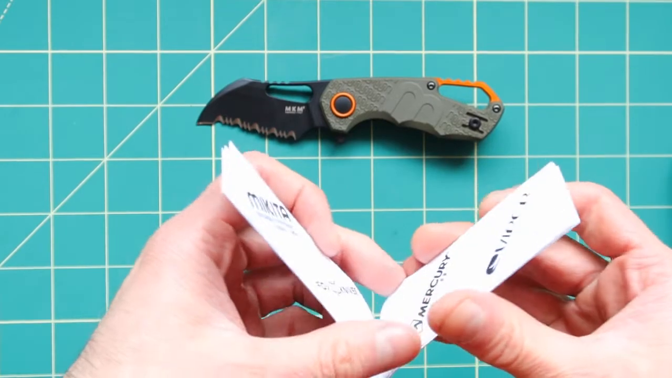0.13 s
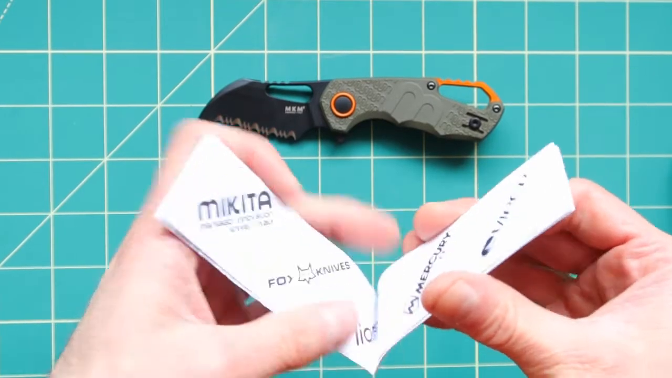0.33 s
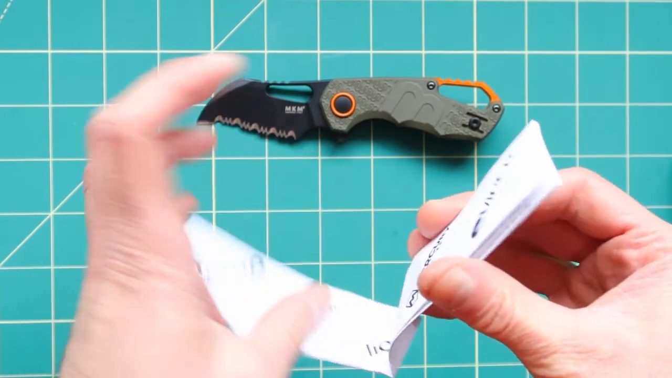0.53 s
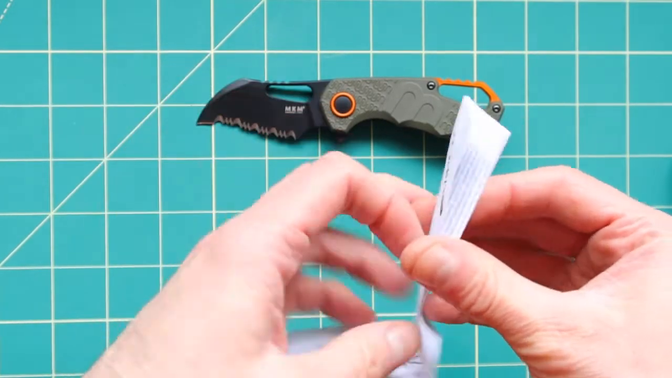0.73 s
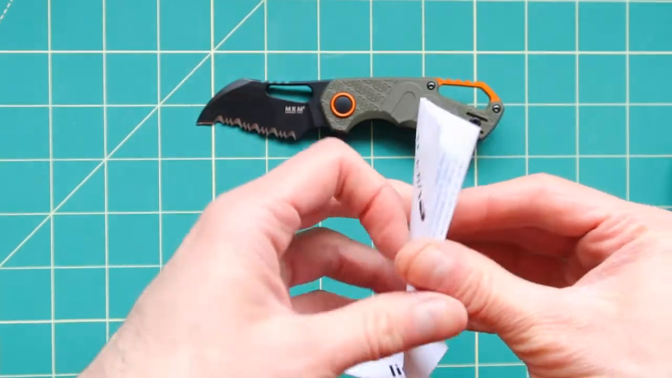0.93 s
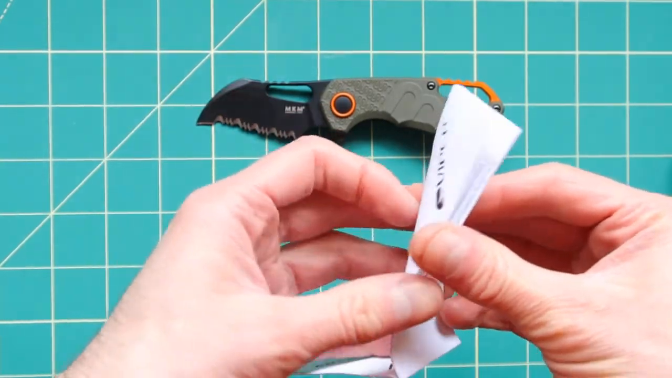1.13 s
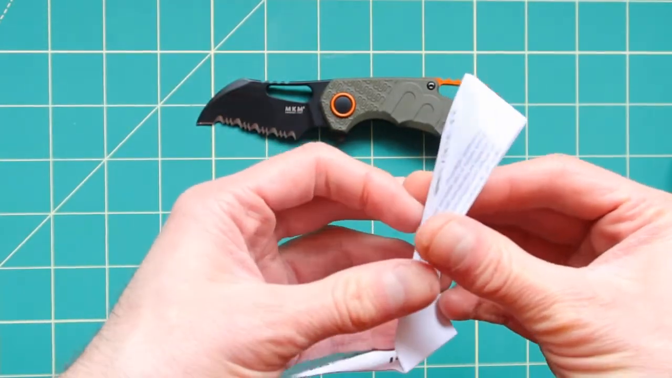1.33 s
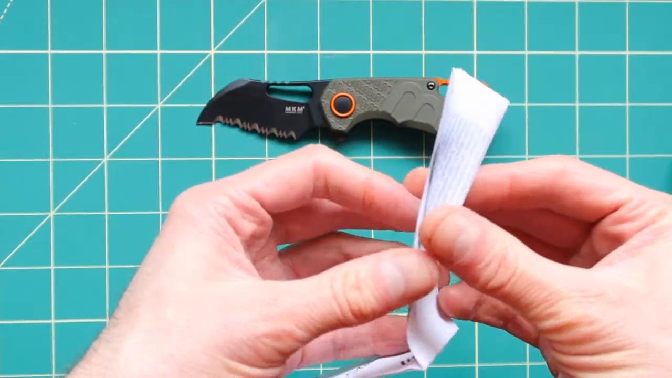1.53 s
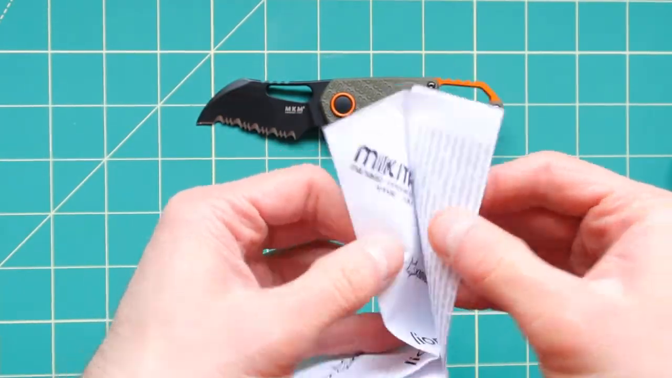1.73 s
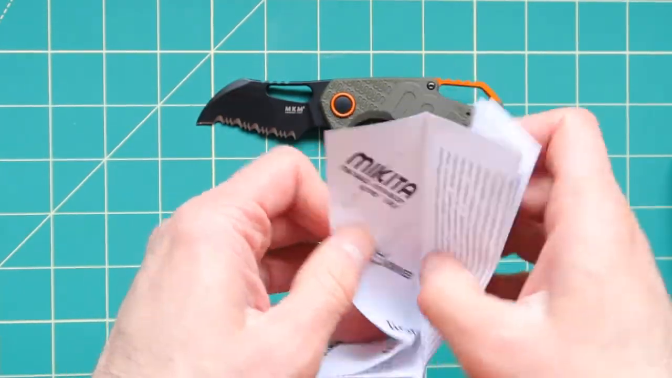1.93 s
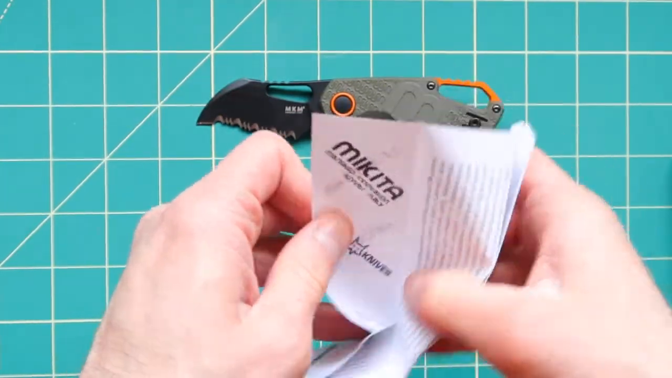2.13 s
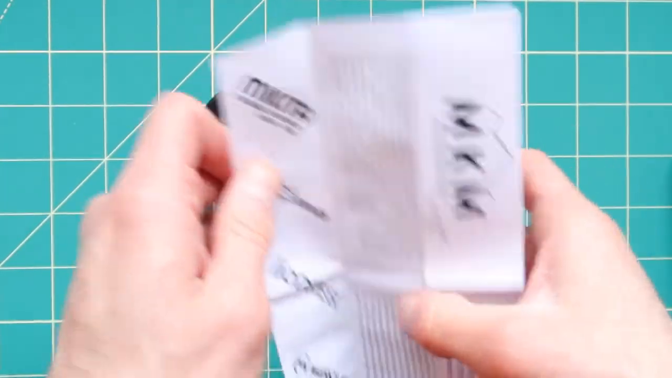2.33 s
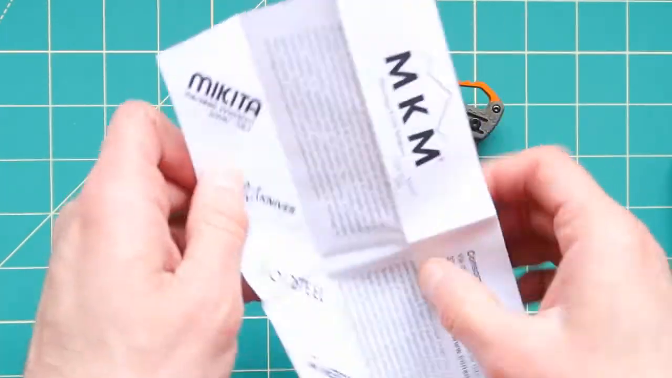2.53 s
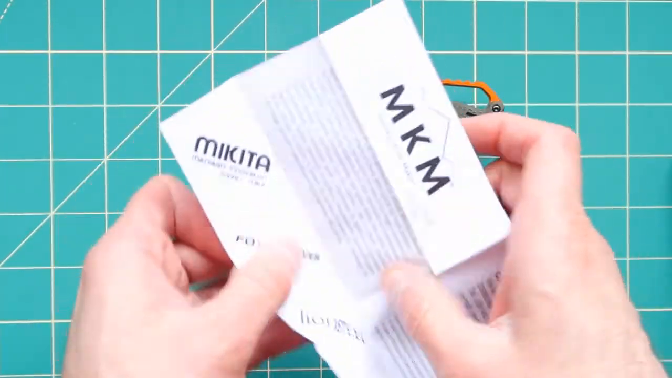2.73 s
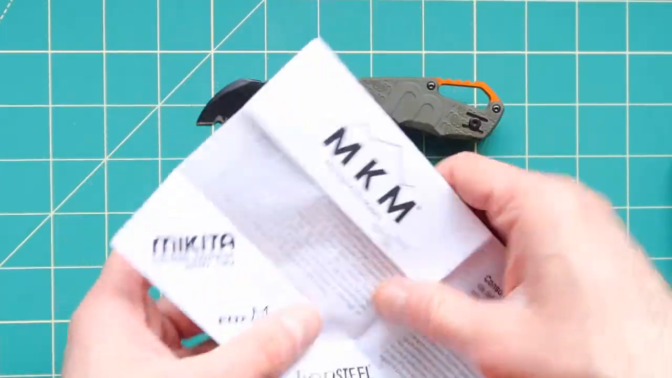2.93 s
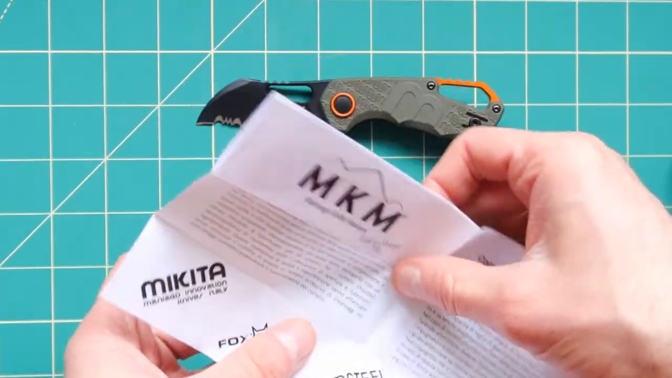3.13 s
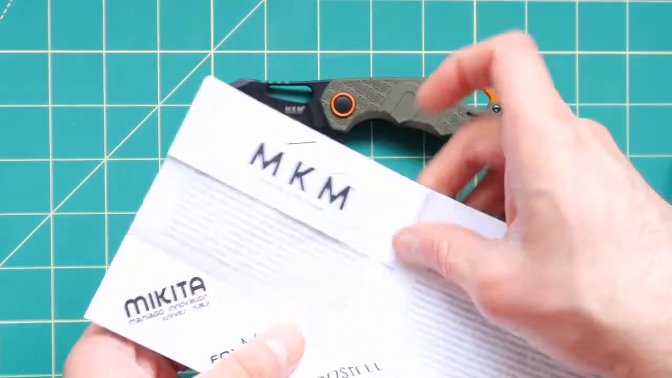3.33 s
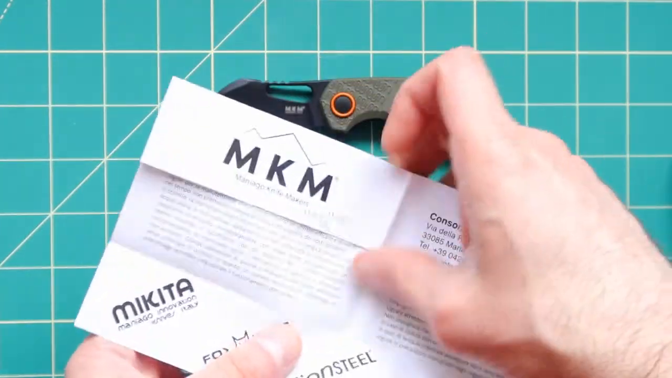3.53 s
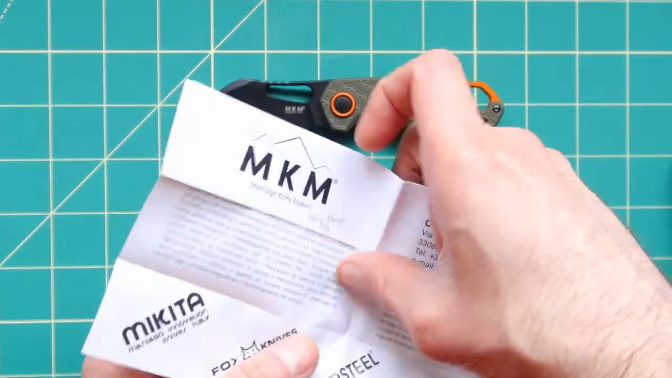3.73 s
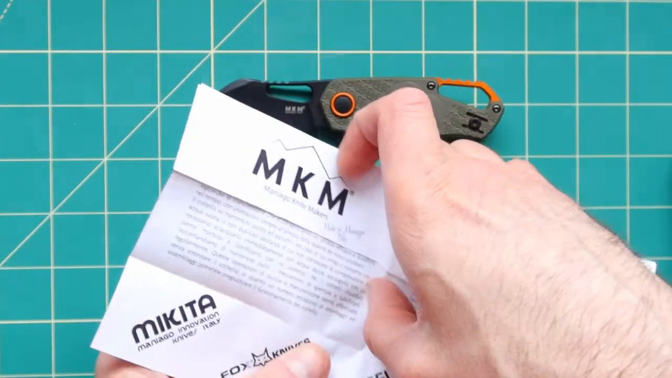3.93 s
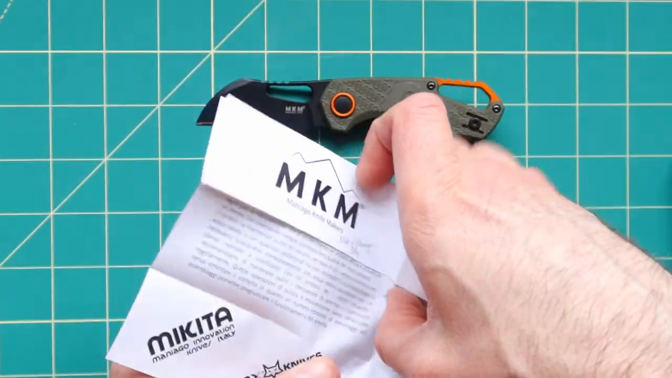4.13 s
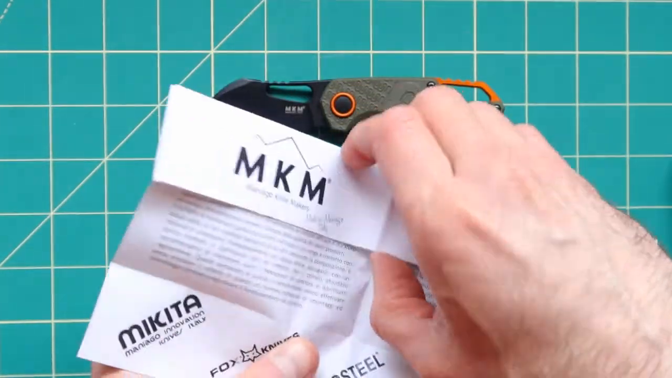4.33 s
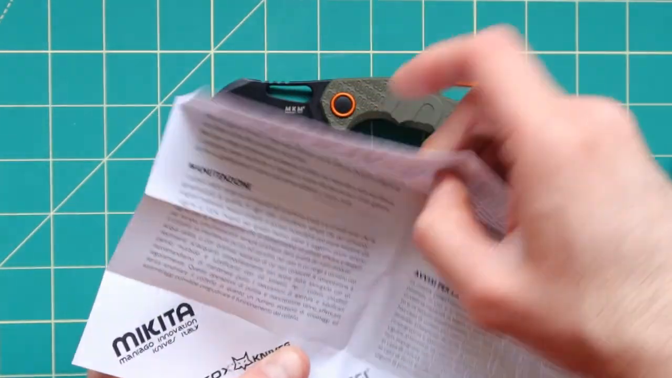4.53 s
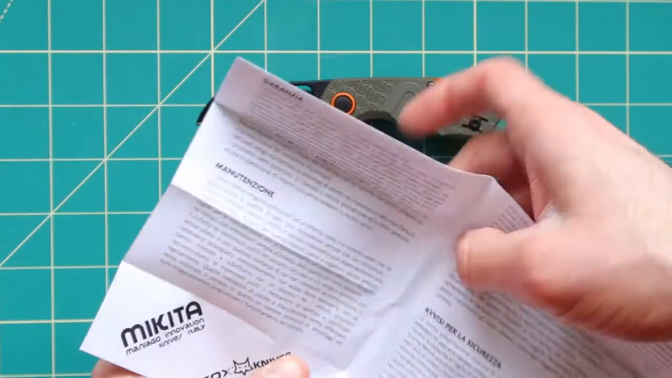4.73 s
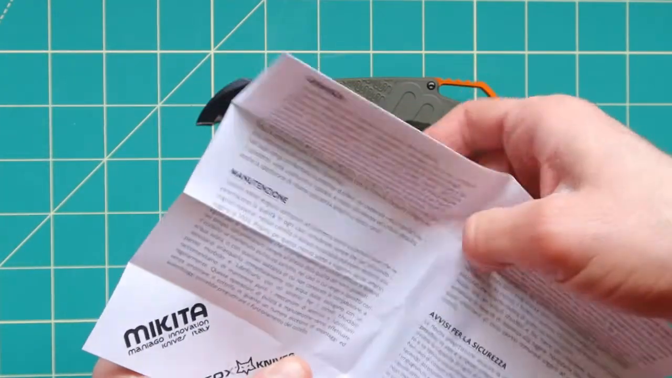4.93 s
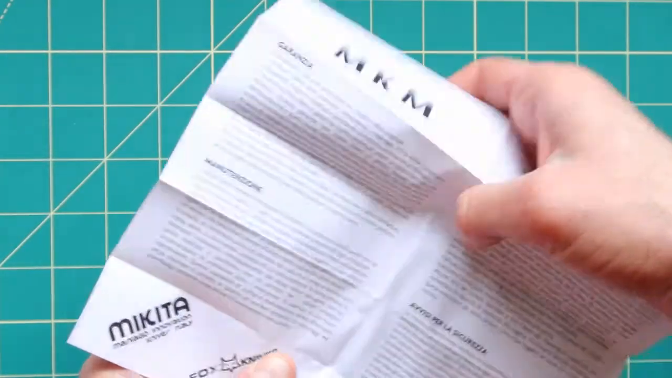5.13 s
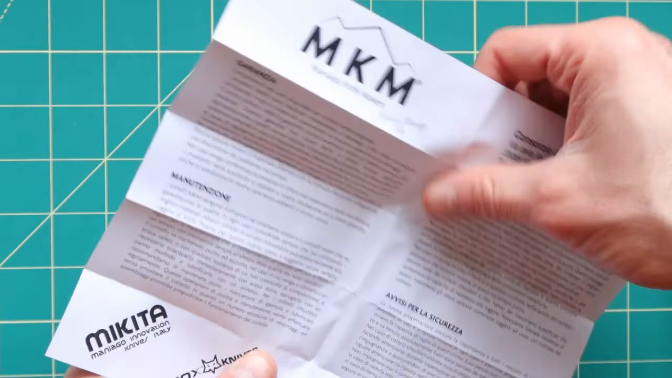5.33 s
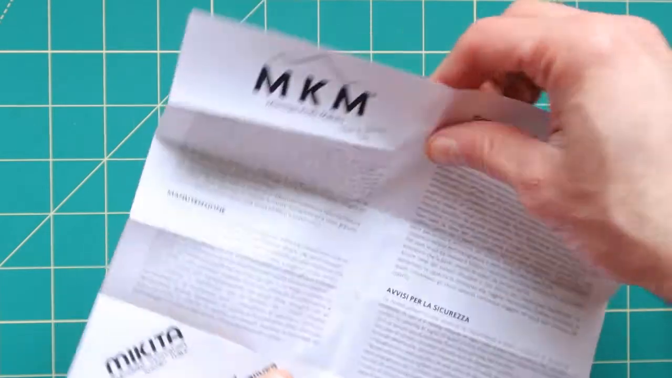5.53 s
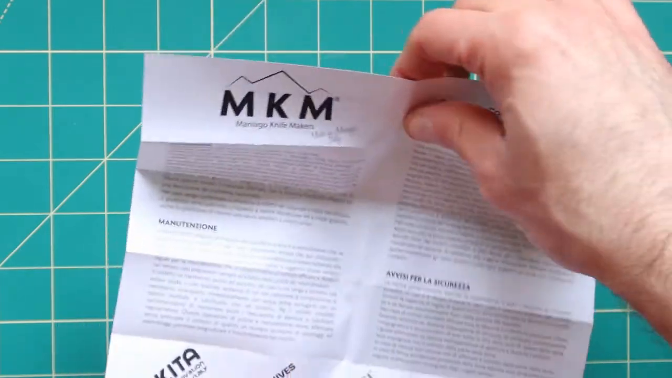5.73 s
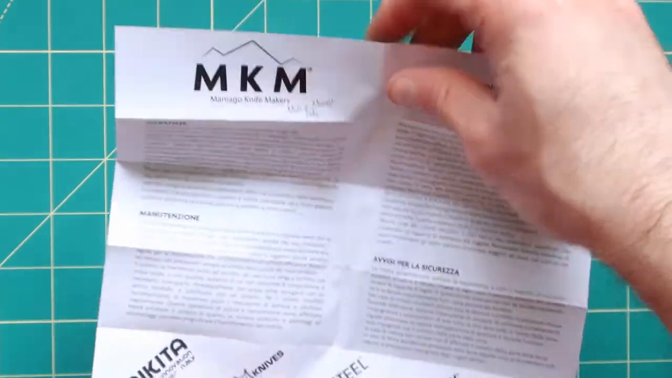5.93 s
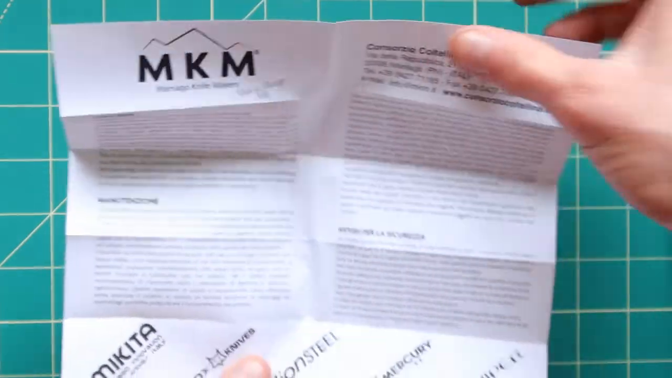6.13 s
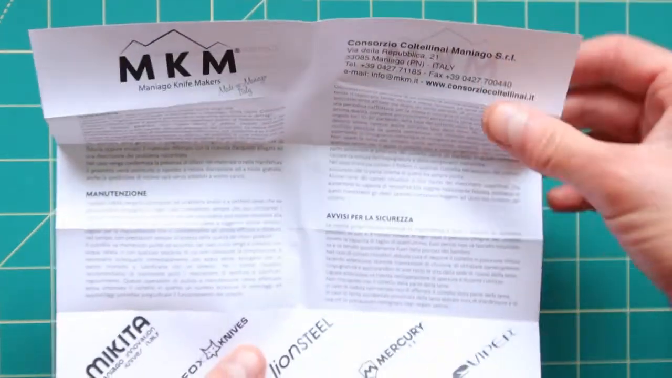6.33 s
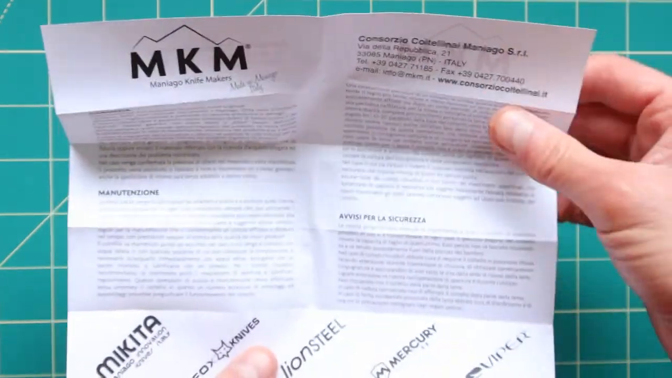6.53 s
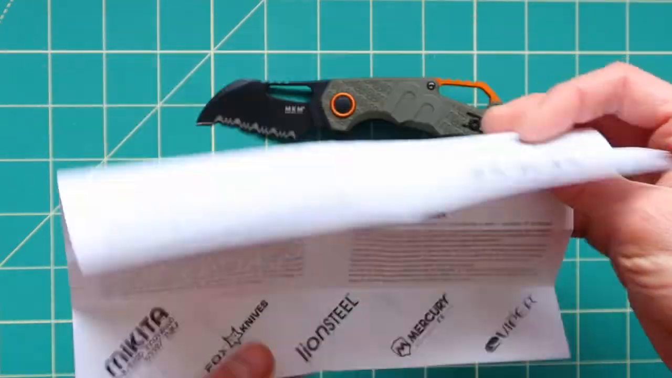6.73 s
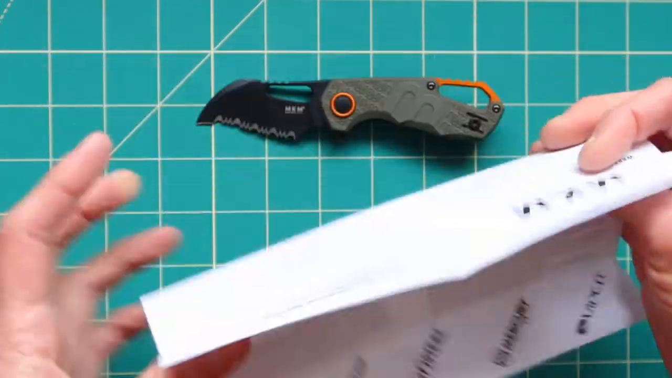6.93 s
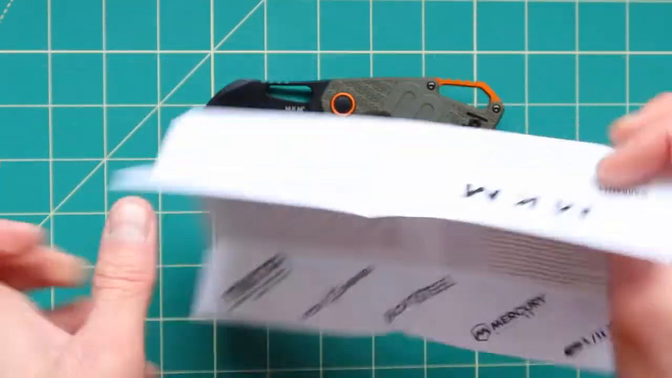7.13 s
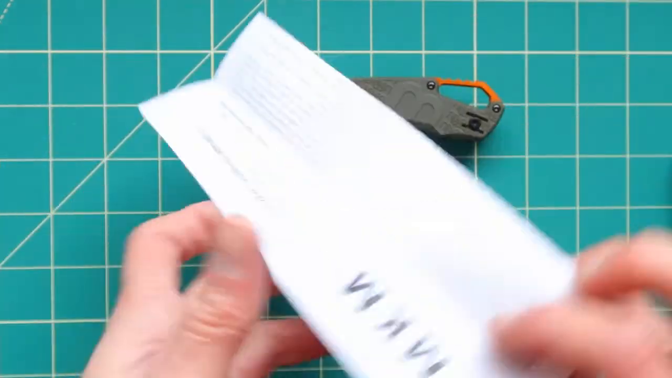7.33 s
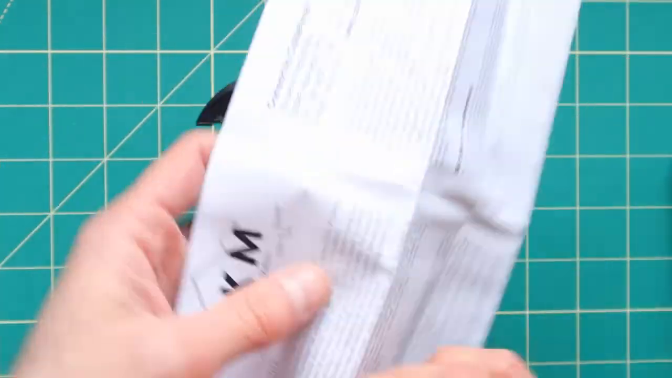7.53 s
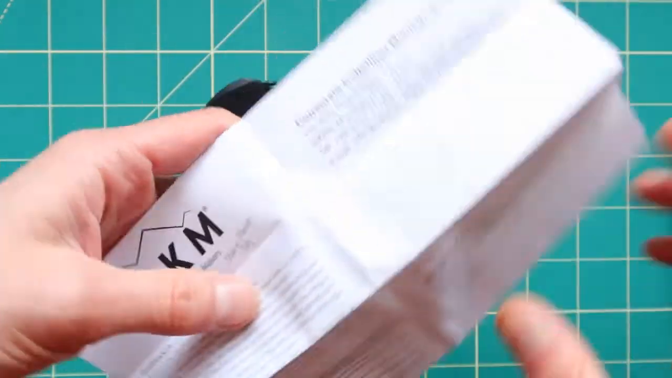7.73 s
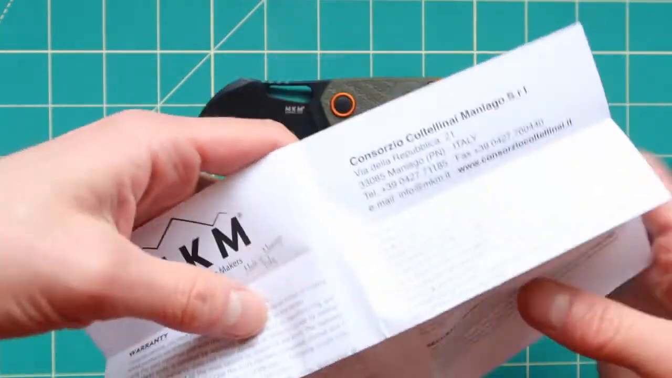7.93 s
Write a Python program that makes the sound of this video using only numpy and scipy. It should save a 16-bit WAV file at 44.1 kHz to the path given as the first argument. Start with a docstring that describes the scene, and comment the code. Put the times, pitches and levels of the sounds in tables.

```python
"""Unfolding a creased paper leaflet

Two hands unfold a leaflet over a desk, heard close up in a quiet room. Creases and panels snap:
noise bursts with a crack, coloured by two resonances. Fingers and folds slide with a grainy hiss of noise
and tiny rings; the half-open fold pops as gliding sines, with dull knocks. Moving paper pushes low noise
puffs. A hum, rumble and room noise lie under it; the highest peaks flatten at a soft ceiling."""
import sys
import numpy as np
from scipy import signal
from scipy.fft import rfft, irfft
from scipy.io import wavfile
from scipy.ndimage import uniform_filter1d, map_coordinates

SR = 44100
rng = np.random.default_rng(int(sys.argv[2]) if len(sys.argv) > 2 else 0)


def store_wav(level_fs):
    """Save 16-bit WAV to argv[1]."""
    pcm = np.round(np.clip(np.atleast_2d(level_fs), -1, 1) * 32767)
    wavfile.write(sys.argv[1], SR, pcm.T.astype(np.int16))


N = 356239

# room noise spectrum: (frequency [Hz], relative level [dB])
FLOOR_COLOUR = [(20, -3.5), (60, 7), (120, -3), (165, 1.5), (195, 9.5), (250, -1.5), (600, -2), (1200, 0),
                (2500, -21), (8000, -32), (16000, -32)]
# low rumble spectrum: (frequency [Hz], relative level [dB])
RUMBLE_COLOUR = [(20, -20), (60, -17), (95, -1.5), (150, 0), (260, -13.5), (600, -30)]
# room decay: (frequency [Hz], t60 [s])
ROOM_T60 = [(200, 0.18), (1000, 0.39), (4000, 0.29), (9000, 0.35), (16000, 0.76)]
# pushed air spectrum: (frequency [Hz], relative level [dB])
AIR_COLOUR = [(15, -21), (40, -1), (80, 9.5), (140, 3.5), (240, -11), (500, -30), (1500, -77)]
# sheet flutter spectrum: (frequency [Hz], relative level [dB])
FLUTTER_COLOUR = [(40, -15), (110, -5), (170, -9.5), (240, 0.5), (330, -7), (500, -1.5), (1500, -53)]
# swings of the loose open sheet: (time [s], length [s], level [dB])
SWINGS = [(6.74, 0.09, -39), (6.916, 0.048, -41.5), (7.26, 0.053, -33.5), (7.451, 0.059, -32.5),
          (7.942, 0.04, -38.5)]
# slides of paper on skin or on itself:
# (time [s], length [s], friction [dB], swell start to end [dB], body [dB], edge [dB])
STROKES = [(0, 0.081, -26.5, -9, 0, -4.5), (0.157, 0.075, -40.5, 17, -11, -11),
           (.25, 0.056, -36.5, 4, 5, -9), (0.362, .19, -28.5, 1.5, 2.5, 6), (.58, 0.077, -44, -11, 8, 14),
           (0.68, 0.16, -34.5, -11, 4, 6.5), (.865, 0.16, -38, -4, -1, -0.5),
           (1.033, 0.076, -23.5, -9, -5, -1.5), (1.183, 0.054, -31, -3, -7, -2.5),
           (1.265, 0.069, -44.5, -3, -5, 6), (1.368, 0.016, -37, 5, 1, 15.5),
           (1.476, 0.032, -23, 3, -6, -1), (1.586, 0.023, -29, 15, -1.5, 1),
           (1.661, 0.082, -17.5, -17, -8.5, -3), (1.742, 0.064, -22, -1, -17, -10),
           (1.834, 0.21, -27, 2.5, 2, 1.5), (2.078, 0.19, -23, -6, -5.5, -4.5),
           (2.238, 0.21, -13.5, -8, -3.5, -7), (2.47, 0.22, -27.5, -12, 2, -9),
           (2.639, 0.19, -21.5, 9, 0.5, -5), (2.919, 0.16, -17.5, -0.5, 1, -5.5),
           (3.172, 0.17, -32.5, -10, 6.5, -1.5), (3.319, 0.14, -21, -4, 2.5, -2),
           (3.507, 0.14, -22.5, 9, 1, -2.5), (3.703, 0.098, -24.5, 2.5, 7, -3.5),
           (3.88, 0.31, -21.5, -1.5, 2, -10.5), (4.175, 0.13, -24, 3.5, 1, -6.5),
           (4.334, .15, -30.5, -4, 7.5, -11), (4.481, .115, -18.5, 3.5, 4.5, -6),
           (4.672, 0.073, -24.5, 9, 3.5, -4.5), (4.864, 0.063, -18, -6, -1, -7.5),
           (5.019, 0.24, -24.5, 4, -3.5, -7), (5.25, 0.12, -33.5, 5, -2, -9),
           (5.34, 0.18, -21.5, 7, 6.5, -7.5), (5.522, 0.22, -34.5, 3, 2, 1), (5.877, 0.13, -38, 3, 1, -3),
           (6.02, 0.11, -30.5, -4, 3.5, 1), (6.152, 0.25, -35, 5.5, -9, 1),
           (6.385, 0.14, -37, -12, 8.5, -5), (6.584, .16, -27.5, -4.5, 2.5, -0.5),
           (6.715, 0.21, -22, -2.5, -5, -3), (6.926, 0.31, -23.5, -1, -3, -3),
           (7.195, 0.13, -18, 8.5, 3.5, -5.5), (7.35, 0.19, -22, 10, 3, -3),
           (7.58, .13, -29, -15.5, 5.5, -1.5), (7.68, .05, -30.5, -11, -4, -12),
           (7.858, .08, -44, -3, 11, -14), (7.944, 0.16, -26, 8, 3, -8.5)]
# sliding spectrum: (frequency [Hz], relative level [dB])
SLIDE_COLOUR = [(200, -7.5), (380, -8.5), (550, -7.5), (920, -7), (1300, -12), (1750, -11.5), (2450, -11.5),
                (3400, -9), (5500, -5.5), (7400, -6.5), (8700, -2.5), (10100, -15), (12800, -8),
                (15500, -20)]
# tuning of the rubbed sheet by grip and opening:
# (time [s], bass corner [Hz], panel resonance [Hz], resonance height [dB])
GRIP = [(0, 220, 910, -12), (1.45, 200, 900, -7), (1.7, 200, 800, 4), (2.3, 210, 540, -3),
        (3.0, 403, 1090, 6), (3.5, 430, 1520, 2.5), (4.05, 473, 840, 6), (4.6, 269, 1350, 6.5),
        (5.3, 230, 1210, 5), (5.75, 302, 1320, 17.5), (6.1, 330, 1210, 8), (6.5, 300, 1240, 12.5),
        (7.1, 191, 1370, 14.5), (7.5, 150, 1750, 6)]
# span of the knocks of half-open panels on the fingers: (start [s], end [s])
KNOCK_SPAN_S = (2.4, 5.6)
# hollow pops of the half-open fold: (time [s], level [dB], settled pitch [Hz])
POPS = [(2.16, -12.5, 545), (2.286, -23.5, 556), (2.454, -18.5, 544)]
# snaps of creases and panels: (time [s], relative strength [dB], nominal mid-band t60 [s],
# body [dB], edge [dB], panel resonance [Hz], crease resonance [Hz])
SNAPS = [(.1596, -9.5, 0.015, -18, 2, 900, 2260), (.2967, -16.5, .07, 8, 30.5, 1600, 2750),
         (.384, -3, 0.055, 2, 11, 1820, 2770), (0.512, 0.5, 0.034, 0, 13, 880, 3950),
         (0.536, 2, 0.083, -5, 17.5, 920, 2070), (0.726, -8, 0.083, 9, 11, 1330, 2160),
         (0.7721, -5, 0.036, 8.5, 8, 1500, 2460), (1.0482, 2, 0.039, -2, 1, 1900, 4600),
         (1.2076, -4.5, 0.029, -19, 12.5, 1900, 6690), (1.408, -6, 0.046, 9, 17, 1570, 2800),
         (1.7456, 14.5, 0.02, -7.5, 13.5, 774, 3600), (1.7665, 12, .009, -5.5, 5, 870, 5930),
         (1.8, 24, 0.029, -5.5, 3.5, 525, 3000), (1.9564, 22.5, 0.023, -12.5, -0.5, 460, 8030),
         (1.984, 17, .015, -5, -3.5, 605, 2070), (1.9895, 15, .024, -13, -6, 805, 4970),
         (2.0323, 11.5, 0.031, 4, -0.5, 1820, 4270), (2.1457, 18, .016, -14, -17, 850, 2050),
         (2.1596, 22.5, 0.029, -3.5, -8.5, 540, 2120), (2.2534, 17.5, 0.016, -14, -6, 980, 2350),
         (2.3415, 23, 0.015, -11, 5.5, 1930, 3540), (2.4208, 22, .039, -13.5, -2.5, 940, 3900),
         (2.4424, 16.5, 0.042, 2.5, -2, 870, 2460), (2.4533, 24.5, .019, -11.5, -1.5, 570, 2610),
         (2.4971, 11.5, 0.017, -18, -7, 840, 2060), (2.545, 19.5, .025, -9, 7, 1820, 3770),
         (2.6731, 11.5, .1, -1, 1.5, 1220, 1880), (2.6917, 6, 0.022, 1, 5, 930, 1890),
         (2.7572, -8, 0.0091, 14, -4, 1390, 3660), (2.786, 13.5, 0.022, 1.5, 1, 770, 5650),
         (2.8185, 5, 0.011, 2, -6, 1110, 2330), (2.8412, 20.5, 0.02, -5.5, 0, 840, 4660),
         (2.875, -9.5, .013, 16, -6, 1110, 2350), (2.9862, 21, 0.0054, -15, -8.5, 1240, 2360),
         (3.0053, 15.5, .009, -14, 6, 890, 4930), (3.021, 0, .012, 7, 0, 1040, 2450),
         (3.0336, -2.5, 0.069, 18.5, -3, 1330, 2550), (3.0529, 11.5, 0.013, 8, -2, 1400, 2090),
         (3.058, 15.5, 0.023, 1, -6, 940, 2450), (3.153, -3.5, 0.0098, 0.5, -12, 910, 3000),
         (3.3499, -6.5, 0.022, 19, -7, 1260, 2770), (3.4093, -5.5, 0.022, 15.5, 2, 1000, 2500),
         (3.4583, 23.5, .026, -0.5, -0.5, 970, 5600), (3.543, -4.5, 0.035, 14, -13, 1290, 2660),
         (3.593, 5, 0.03, 3.5, 1, 900, 2980), (3.62, 11.5, .078, 4.5, 5, 1460, 4430),
         (3.6888, 21, 0.029, -3, 7, 1410, 4730), (3.6998, 16.5, 0.0085, -7.5, -17, 974, 1840),
         (3.7432, 14, 0.038, -1.5, 3.5, 507, 2600), (3.7632, 4.5, 0.049, 7.5, -5, 1310, 5560),
         (3.8276, 5.5, 0.0096, 6.5, -24, 1070, 1870), (3.8517, 19, 0.016, -1, 8, 1260, 3100),
         (4.164, 23, 0.014, -6.5, -2.5, 845, 1690), (4.2223, 7, 0.019, 1, -15, 820, 2880),
         (4.229, 10, 0.014, -4, -9, 900, 3120), (4.2943, 6, 0.1, 6, -5, 890, 3950),
         (4.3095, 10, 0.01, 6, -8, 1210, 3000), (4.3442, -5, 0.013, 9, -12, 1130, 3000),
         (4.39, 23, 0.021, -19.5, -8.5, 533, 4830), (4.4275, 20.5, 0.02, -4.5, -2, 1050, 5770),
         (4.5032, 0.5, .09, 12.5, -1, 1270, 2450), (4.5447, 17.5, 0.042, -8, -13, 640, 4270),
         (4.5804, 8.5, .12, 7, 14, 1450, 2480), (4.6515, 15, 0.013, -6.5, 11.5, 880, 3940),
         (4.8025, -5.5, 0.022, 10.5, -16, 1290, 2300), (4.839, 4.5, 0.055, 7.5, 3.5, 1230, 2770),
         (4.8828, 23.5, 0.031, -4, 2, 960, 2040), (4.915, 5, .014, -3, -2, 590, 2350),
         (4.9392, 8, 0.054, 11, 2, 1260, 2550), (4.968, 1.5, 0.03, 5.5, -4, 620, 2770),
         (5.0022, 26, 0.019, -12, 2, 615, 2530), (5.121, 16.5, 0.04, -6.5, 5.5, 900, 2650),
         (5.142, 15.5, .048, -2.5, 5, 900, 3700), (5.17, 7, 0.084, 9.5, 7, 1670, 2400),
         (5.2019, 22, .02, -10.5, 4, 537, 5900), (5.3768, 4.5, 0.02, -6, -5, 840, 5990),
         (5.4411, 12, 0.045, -4, 4.5, 515, 2400), (5.4555, 12, 0.043, -4.5, -3, 950, 1880),
         (5.496, 17.5, 0.026, -4, 2, 444, 5350), (5.5161, 22.5, 0.041, -7.5, 3.5, 430, 5440),
         (5.642, -5, 0.049, 8, -8, 1110, 4270), (5.7256, 5, .039, 8, -12, 1350, 3560),
         (5.746, 0, 0.021, 7.5, -12, 1220, 1880), (6.7565, 13.5, 0.1, 4, -2, 920, 3060),
         (6.7657, 25.5, .05, -5.5, -3.5, 1035, 3870), (6.866, 7.5, 0.058, -3, 7.5, 1190, 1970),
         (6.9632, 23, 0.065, -8, -6.5, 1400, 4220), (7.2524, 19.5, 0.044, -4, -4.5, 1640, 2060),
         (7.316, 12, 0.053, 1, 4.5, 1780, 2420), (7.391, 4.5, 0.032, 6, 7.5, 1520, 5000),
         (7.4901, 21, 0.046, -3, 6.5, 1800, 3330), (7.5134, 20, 0.16, -5.5, 1, 1770, 4110),
         (7.5477, 21, 0.021, -14, 9, 506, 8100), (7.5604, 2.5, 0.014, 2, 20, 1820, 5960),
         (7.8582, 16.5, 0.015, -6, -12.5, 1660, 4270), (8.002, -7, 0.04, 24, -7, 1530, 1990)]
# snap spectrum: (frequency [Hz], relative level [dB])
SNAP_COLOUR = [(200, -10), (350, -5.5), (550, -2), (900, -1.5), (1300, -5), (1700, -8.5), (2300, -3.5),
               (4000, -7.5), (6500, -9.5), (8700, -11), (10200, -21.5), (12700, -18), (15500, -30.5)]
# tilt corners: (full body [Hz], neutral [Hz], full edge [Hz])
TILT_HZ = [500, 2500, 9000]

FLOOR_DB = -59
HUM_HZ, HUM_DB, HUM_FADE_FROM_S, HUM_FADE_DB_PER_S = 148, -52, 2.25, 5.5
RUMBLE_DB = -3.5  # relative to the hum
DRAFT_DB, DRAFT_SLOPE = -47.5, 0.63  # level at 0 dB friction; dB per dB of friction
PUFF_DB, PUFF_SLOPE = -54.5, 0.44  # level at 0 dB snap strength; dB per dB of strength
PUFF_RISE_S, PUFF_T60_S = 0.0066, 0.096
SWING_RISE_S, SWING_T60_S = 0.043, 0.56
STROKE_RISE_S, STROKE_T60_S = 0.042, 0.23  # the grip gives way, then the paper coasts to rest
RESTING_DB = -47  # friction of a sheet that is only held
RUB_CREASE_HZ, RUB_CREASE_DB = 2500, 5.5
KNOCKS_PER_S, KNOCK_DB, KNOCK_SPREAD_DB = 9, 12.5, 4.5  # dB above friction; +/- dB
KNOCK_T60_S, KNOCK_BODY_DB, KNOCK_EDGE_DB, KNOCK_PANEL_HZ = .01, 8, -11, (825, 1550)
PANEL_DB, CREASE_DB = 10, 7  # base panel and crease resonance heights of a snap
BLUNT_SLOPE = 0.52  # panel dB gained per dB of edge below 0
EDGE_HZ = 16100  # band limit


def amp(db):
    """Decibels to gain."""
    return 10 ** (np.asarray(db) / 20)


def evened(x):
    """Scales to rms 1."""
    return x / np.sqrt(np.mean(x ** 2) + 1e-20)


def read(points, hz):
    """Interpolates a spectrum table on a log-frequency axis."""
    f, value = np.transpose(points)
    return np.interp(np.log(hz + 1), np.log(f + 1), value)


def follow(rows, t):
    """Columns of a curve table at the times t."""
    s, *columns = np.transpose(rows)
    return [np.interp(t, s, column) for column in columns]


def add(mix, s, sound):
    """Mixes a sound in at time s."""
    part = mix[max(round(s * SR), 0):][:len(sound)]
    part += sound[:len(part)]


def noise(colour):
    """Noise of rms 1 with the given spectrum."""
    gain = amp(read(colour, np.fft.rfftfreq(N, 1 / SR)))
    return evened(irfft(rfft(rng.standard_normal(N)) * gain, N))


def wander(rate_hz):
    """Smooth chance of rms 1, low-passed near the given rate."""
    gain = 1 / (1 + (np.fft.rfftfreq(N, 1 / SR) / rate_hz) ** 4)
    return evened(irfft(rfft(rng.standard_normal(N)) * gain, N))


def gesture(u, length, rise_s, t60):
    """Attack, hold and release, u seconds after the start."""
    return np.clip(u / rise_s, 0, 1) * amp(-60 * np.maximum(u - length, 0) / t60)


def causal(db):
    """Minimum-phase response with this gain: nothing sounds before the blow."""
    log_gain = np.log(amp(np.r_[db, db[-2:0:-1]]))
    return np.exp(np.conj(signal.hilbert(log_gain)))[:len(db)]


def tilt(hz, body_db, edge_db):
    """Wide loose panels add body; stiff edges add treble."""
    body_share = read(list(zip(TILT_HZ, [1, 0, 0])), hz)
    edge_share = read(list(zip(TILT_HZ, [0, 0, 1])), hz)
    return body_db * body_share + edge_db * edge_share


def bump(hz, centre_hz, width):
    """Resonance of height 1; half-width is a share of its centre."""
    return 1 / (1 + ((hz - centre_hz) / (width * centre_hz)) ** 2)


def leak(hz, corner_hz):
    """Air slips round a small sheet, so it radiates little bass (dB)."""
    return -10 * np.log10(1 + (corner_hz / (hz + 1)) ** 4)


def background(drift_rad=0.34):
    """Room noise, a low hum wavering in phase and level, and rumble that fades with it."""
    t = np.arange(N) / SR
    hum_db = HUM_DB - HUM_FADE_DB_PER_S * np.maximum(t - HUM_FADE_FROM_S, 0)
    waver = 1 + .2 * wander(rate_hz=5)
    phase = 2 * np.pi * HUM_HZ * t + drift_rad * wander(rate_hz=4)
    hum = np.sqrt(2) * np.sin(phase) * waver
    rumble = amp(RUMBLE_DB) * noise(RUMBLE_COLOUR)
    return amp(hum_db) * (hum + rumble) + amp(FLOOR_DB) * noise(FLOOR_COLOUR)


def room(x, onset_s=0.0052, size=22050):
    """A small furnished room: a faint noise tail with a frequency-dependent decay."""
    hz, t, z = signal.stft(rng.standard_normal(size), SR, nperseg=256)
    decay = amp(-60 * t / read(ROOM_T60, hz)[:, None])
    tail = signal.istft(z * decay, SR, nperseg=256)[1][:size]
    tail = tail * np.clip(np.arange(size) / SR / onset_s - .5, 0, 1)  # silent for half of onset_s
    return signal.fftconvolve(x, tail / np.linalg.norm(tail))[:N]


def friction(t):
    """Level, body and edge (dB) of the sliding at times t; overlapping strokes add in power."""
    s, length, level_db, swell_db, body_db, edge_db = np.transpose(STROKES)[:, :, None]
    progress = np.clip((t - s) / length, 0, 1)
    level = amp(level_db + swell_db * (progress - .5))
    power = (level * gesture(t - s, length, STROKE_RISE_S, STROKE_T60_S)) ** 2
    total = power.sum(0) + amp(RESTING_DB) ** 2
    return 10 * np.log10(total), (power * body_db).sum(0) / total, (power * edge_db).sum(0) / total


def air(lumpy_db=2, gusty_db=2, size=128):
    """Slides and snaps push soft low puffs; the open sheet flutters lumpily as it is turned over."""
    t = np.arange(0, N, size) / SR
    draft_power = amp(DRAFT_DB + DRAFT_SLOPE * friction(t)[0]) ** 2
    puff_power, swing_level = np.zeros(len(t)), np.zeros(len(t))
    for s, strength_db, *_ in SNAPS:
        puff = amp(PUFF_DB + PUFF_SLOPE * strength_db) * gesture(t - s, 0, PUFF_RISE_S, PUFF_T60_S)
        puff_power += puff ** 2
    for s, length, level_db in SWINGS:
        swing_level += amp(level_db) * gesture(t - s, length, SWING_RISE_S, SWING_T60_S)
    times = np.arange(N) / SR
    push = np.interp(times, t, np.sqrt(draft_power + puff_power))
    swing = np.interp(times, t, swing_level)
    puffs = push * amp(gusty_db * wander(rate_hz=12)) * noise(AIR_COLOUR)
    flutter = swing * amp(lumpy_db * wander(rate_hz=37)) * noise(FLUTTER_COLOUR)
    return puffs + flutter


def grains(per_s, spread_db, low_hz, high_hz, cycles, count=24, size=900):
    """Tiny slips of uneven size, each a brief decaying ring at one spot of the sheet."""
    t, out = np.arange(size) / SR, np.zeros(N + size)
    at = np.flatnonzero(rng.random(N) < per_s / SR)
    heights = amp(spread_db * np.minimum(rng.exponential(1, N), 4)) * rng.choice([-1, 1], N)
    spots = rng.integers(0, count, N)
    hz = np.geomspace(low_hz, high_hz, count)[:, None]
    rings = np.sin(2 * np.pi * hz * t) * np.exp(-t * hz / cycles) * hz / high_hz
    np.add.at(out, at[:, None] + np.arange(size), heights[at, None] * rings[spots[at]])
    return evened(out[:N])


def folds(x, share=0.23, drift=0.0823, count=5):
    """Fingers, folds and desk reflect within milliseconds; paths drift as the hands move."""
    n, out = np.arange(N), x
    for delay_s in np.geomspace(.0009, .006, count) * rng.uniform(0.859, 1.15, count):
        delay = delay_s * SR * np.exp(drift * wander(rate_hz=0.74))
        out = out + share * rng.choice([-1, 1]) * map_coordinates(x, [n - delay], order=3)
    return evened(out)


def sliding(fizz_db=-8, crinkle_db=-22, ticks_db=-20, judder_db=1.6, lumpy_db=1.48, patchy_db=2.16):
    """Fibres catch and let go: hiss, fizz, soft crinkles and stray ticks, coloured by the sheet."""
    fizz = grains(per_s=700, spread_db=2.0, low_hz=2030, high_hz=14100, cycles=0.16)
    crinkles = grains(per_s=61, spread_db=4, low_hz=553, high_hz=1570, cycles=1.8)
    ticks = grains(per_s=21, spread_db=2, low_hz=1480, high_hz=7960, cycles=0.95)
    stick_slip = amp(judder_db * wander(rate_hz=76) + lumpy_db * wander(rate_hz=27))
    drive = (rng.standard_normal(N) + amp(fizz_db) * fizz) * stick_slip
    drive = drive + amp(crinkle_db) * crinkles + amp(ticks_db) * ticks
    hz, t, z = signal.stft(folds(drive), SR, nperseg=512, noverlap=384)
    hz = hz[:, None]
    friction_db, body_db, edge_db = friction(t)
    bass_hz, panel_hz, panel_db = follow(GRIP, t)
    patches = uniform_filter1d(rng.standard_normal(z.shape), size=9, axis=0)
    patches = evened(uniform_filter1d(patches, size=30, axis=1))
    db = friction_db + read(SLIDE_COLOUR, hz) + tilt(hz, body_db, edge_db)
    db = db + leak(hz, bass_hz) + patchy_db * patches
    db = db + panel_db * bump(hz, panel_hz, width=0.15)
    db = db + RUB_CREASE_DB * bump(hz, RUB_CREASE_HZ, width=0.2)
    return signal.istft(z * amp(db), SR, nperseg=512, noverlap=384)[1][:N]


def pocket(t60=0.094, sag=0.019, sag_s=0.014):
    """A buckling panel rings the air in the half-open fold; pitch sags as the fold widens."""
    t, out = np.arange(SR // 2) / SR, np.zeros(N)
    for s, level_db, hz in POPS:
        turns = np.cumsum(hz * (1 + sag * np.exp(-t / sag_s))) / SR
        add(out, s, amp(level_db - 60 * t / t60) * np.sin(2 * np.pi * turns))
    return out


def knocks():
    """Small dull bucklings, one at a chance moment of each time slot, louder with more friction."""
    out = np.zeros(N)
    slots = np.arange(*KNOCK_SPAN_S, 1 / KNOCKS_PER_S)
    for slot_s, (late, force, panel) in zip(slots, rng.random((len(slots), 3))):
        s = slot_s + late / KNOCKS_PER_S
        strength_db = friction(s)[0][0] + KNOCK_DB + KNOCK_SPREAD_DB * (2 * force - 1)
        panel_hz = np.interp(panel, [0, 1], KNOCK_PANEL_HZ)
        add(out, s, snap(strength_db, KNOCK_T60_S, KNOCK_BODY_DB, KNOCK_EDGE_DB, panel_hz, RUB_CREASE_HZ))
    return out


def snap(strength_db, t60, body_db, edge_db, panel_hz, crease_hz,
         crack=3.17, after_db=-19, after_t60=0.099, size=4096):
    """A crease flips with a crack: bending waves race round the sheet and die, the slow low ones last."""
    t, hz = np.arange(size) / SR, np.fft.rfftfreq(size, 1 / SR)
    waves, echoes = rng.standard_normal((2, size))
    low, not_high = (irfft(rfft(waves) / (1 + (hz / split_hz) ** 4)) for split_hz in (1500, 7000))
    decay_db = -60 * t / max(t60, .006)
    burst = low * amp(decay_db / 1.52)
    burst = burst + (not_high - low) * amp(decay_db)
    burst = burst + (waves - not_high) * amp(decay_db / 0.74)
    # the rest of the sheet shivers
    burst = burst + echoes * amp(after_db - 60 * t / after_t60) * (1 - np.exp(-t / 0.0035))
    spectrum = rfft(burst + crack * signal.unit_impulse(size))
    # even out broad regions; narrow chance resonances stay, more so in the treble
    fine, broad = (uniform_filter1d(abs(spectrum) ** 2, size=bins) for bins in (31, 121))
    fine_share = 1 / (1 + (hz / 1800) ** 4)
    power = uniform_filter1d(fine_share * fine + (1 - fine_share) * broad, size=21)
    spread_db = 10 * np.log10(power + 1e-12)
    db = strength_db + read(SNAP_COLOUR, hz) + tilt(hz, body_db, edge_db) + leak(hz, corner_hz=202)
    panel_db = PANEL_DB + BLUNT_SLOPE * max(-edge_db, 0)  # a blunt snap rings its panel more
    db = db + panel_db * bump(hz, panel_hz, width=0.2) + CREASE_DB * bump(hz, crease_hz, width=0.1)
    return irfft(spectrum * causal(db - spread_db))


def snaps():
    """The listed bucklings of creases and panels."""
    out = np.zeros(N)
    for s, *shape in SNAPS:
        add(out, s, snap(*shape))
    return out


def scene(snap_db=0.5, slide_db=-1.23, room_db=-18):
    """Leaflet, its room, air and background, in one channel."""
    paper = amp(snap_db) * snaps() + knocks() + pocket() + amp(slide_db) * sliding()
    return (paper + amp(room_db) * room(paper) + air() + background())[None]


def record(dry, ceiling=1.0):
    """Flattens the sharpest peaks at a soft ceiling, then limits the band."""
    flattened = dry / (1 + (dry / ceiling) ** 6) ** (1 / 6)
    low_pass = signal.firwin(255, EDGE_HZ, window=("kaiser", 7), fs=SR)
    return signal.oaconvolve(flattened, low_pass[None], "same")


dry = scene()
out = record(dry)
store_wav(out)
```